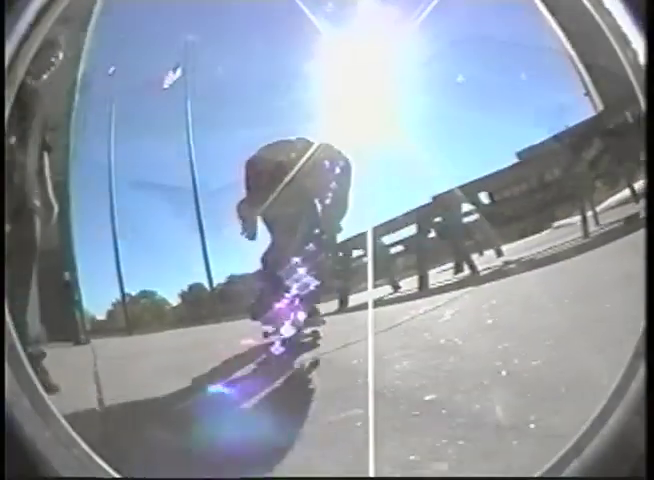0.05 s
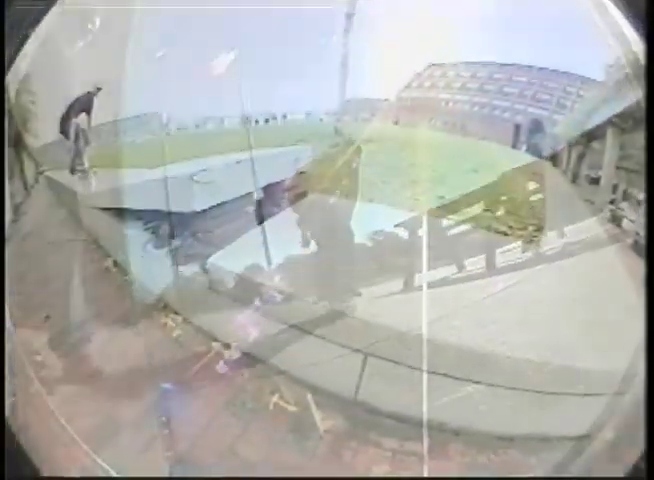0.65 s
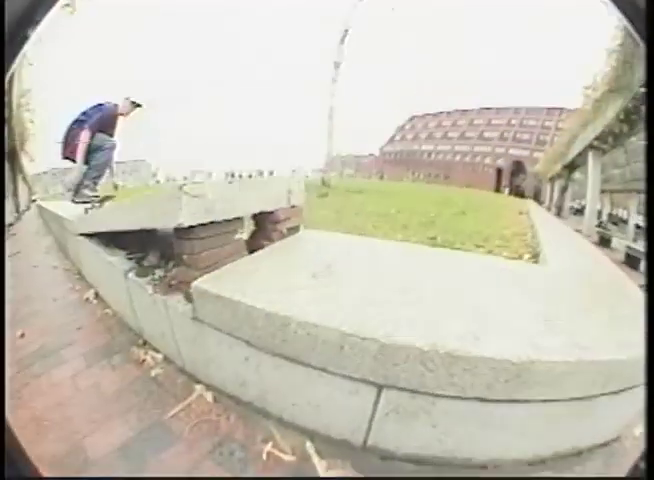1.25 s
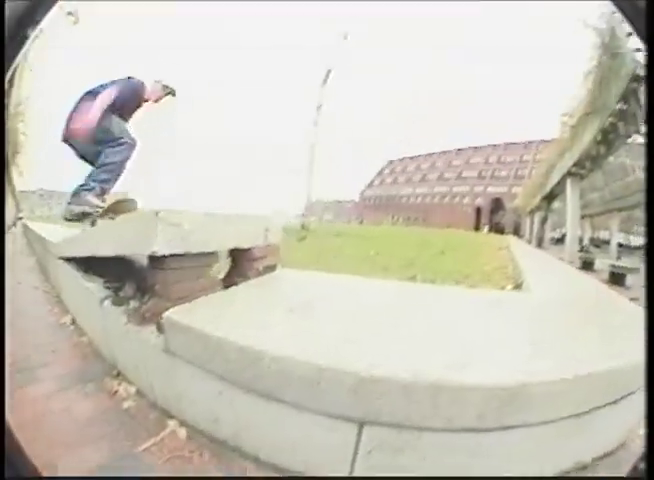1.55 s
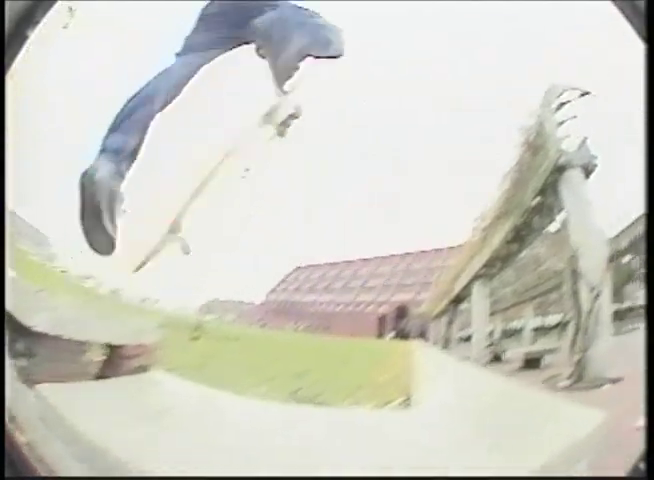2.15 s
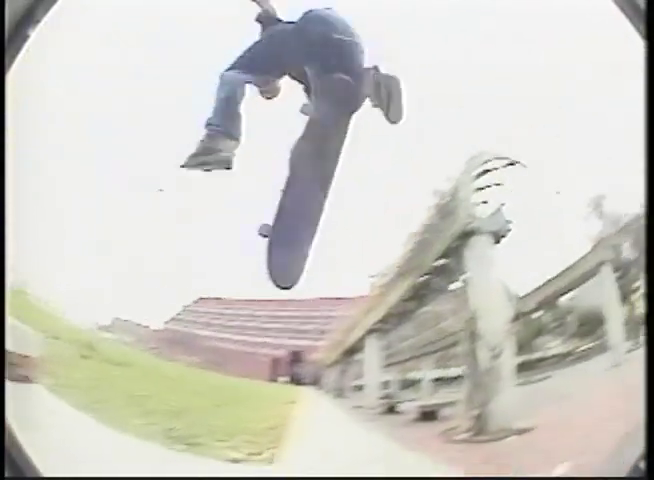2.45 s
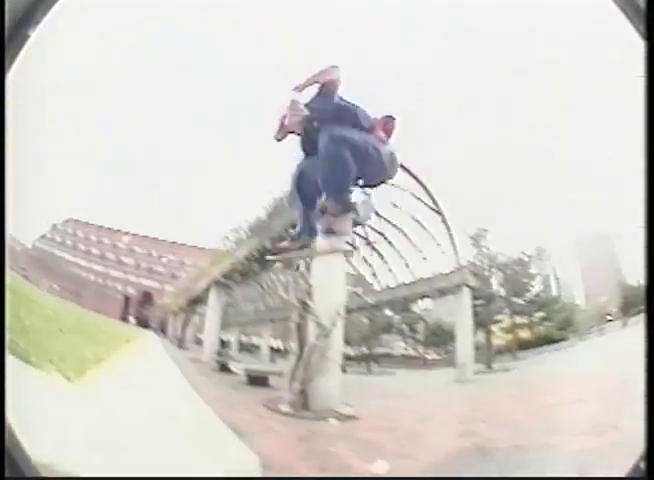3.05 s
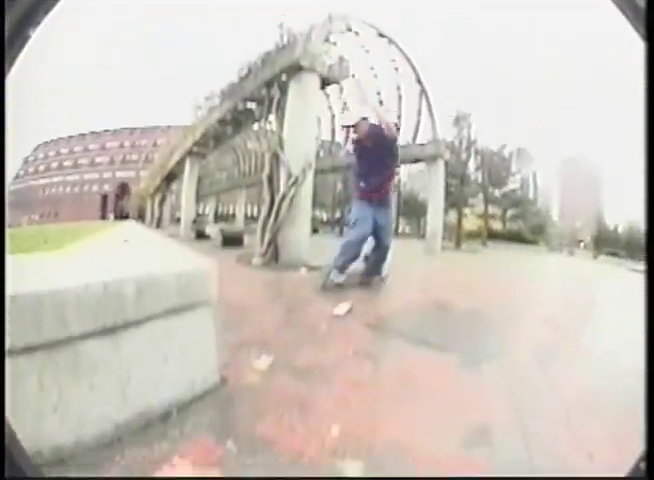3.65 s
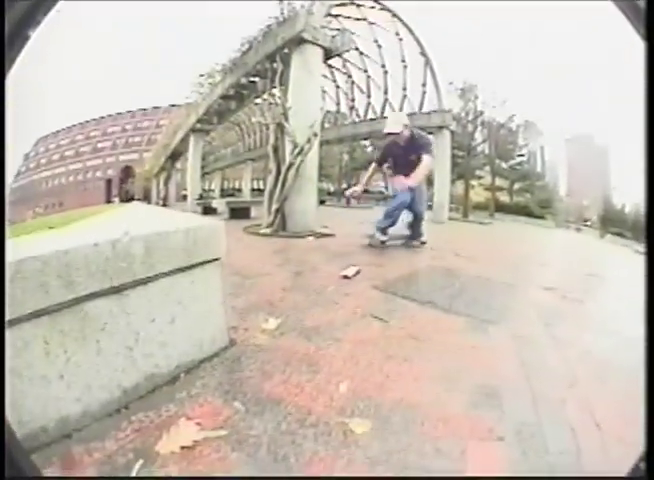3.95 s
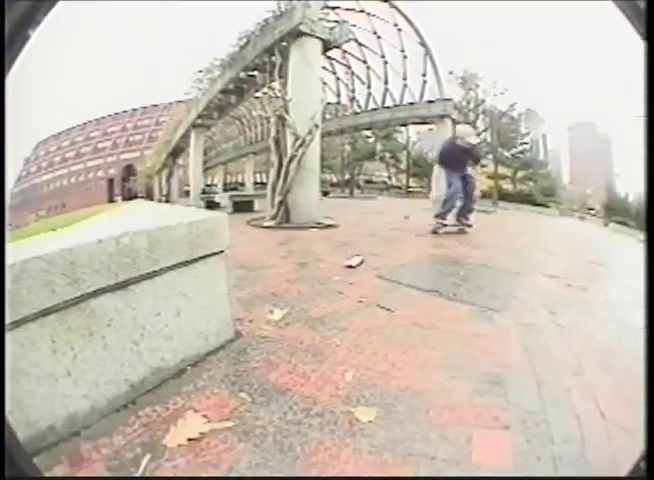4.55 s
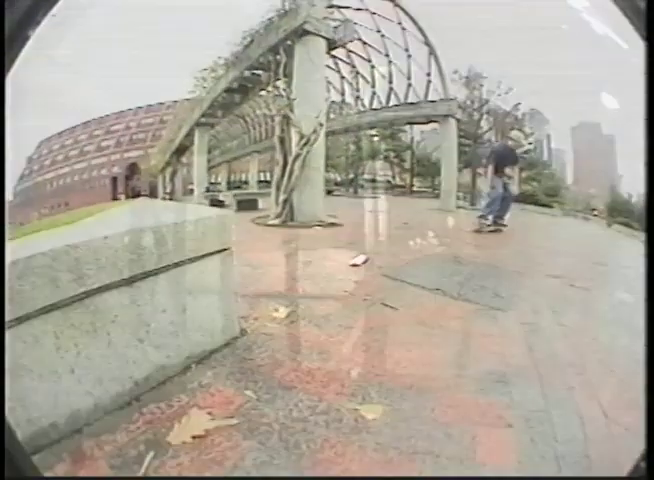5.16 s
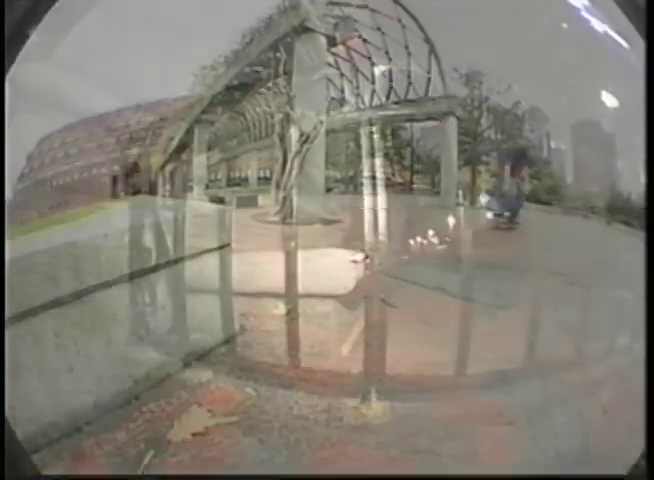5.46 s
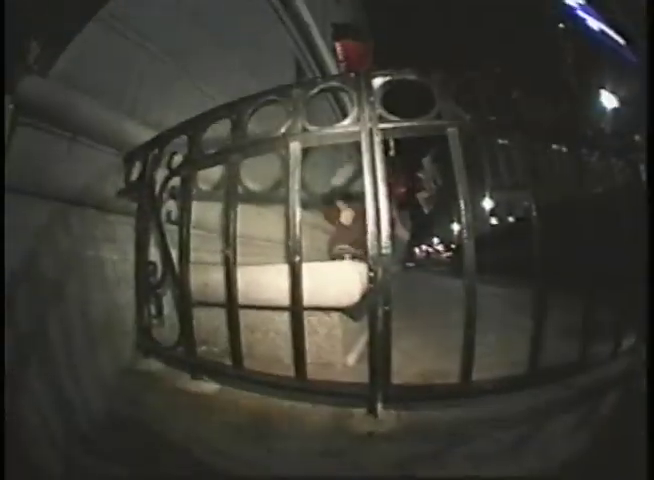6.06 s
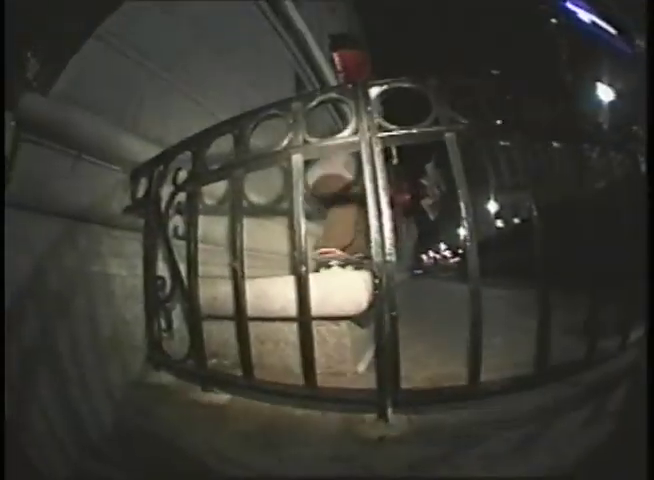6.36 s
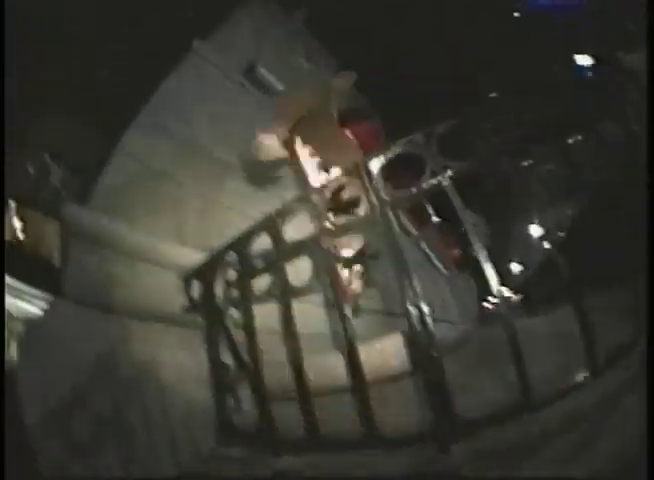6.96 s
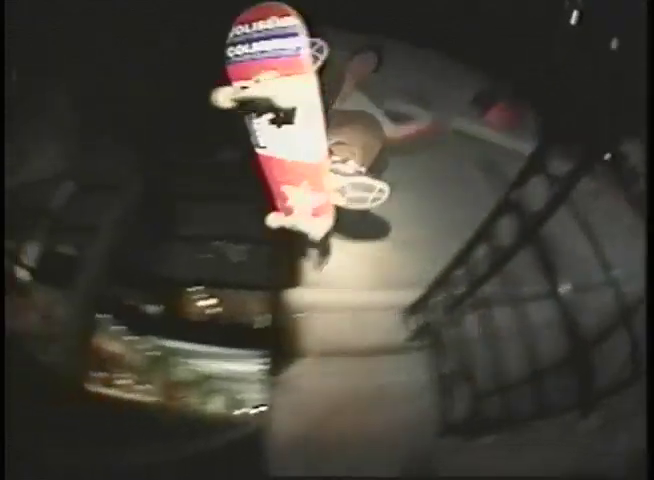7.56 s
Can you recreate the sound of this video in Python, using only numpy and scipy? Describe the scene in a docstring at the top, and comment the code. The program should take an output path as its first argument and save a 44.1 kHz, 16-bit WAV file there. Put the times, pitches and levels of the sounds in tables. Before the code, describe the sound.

In a paved town square, a skateboard rumbles and clacks over slabs, slams twice and pops into the air. Its wheels spin freely until a clattering landing, then it rolls off quietly with soft stamps on the deck. Another gritty run cuts in, followed by a crack of the tail, whirring bearings and a few knocks. The close microphone sounds slightly hollow and overloads on the hardest hits, which echo lightly.

```python
"""A paved town square, where a skateboard makes three runs close to a small microphone.
Hard wheels roar over the paving, snap chips of stone and knock across its seams. The rider pushes down,
the tail pops, the wheels spin free, the board knocks in the air and lands. Buildings and a far wall throw
the cracks back over the hum of the town. The microphone overloads on them and sounds hollow in the lows.
"""
import sys
import numpy as np
from scipy import signal
from scipy.fft import rfft, irfft, next_fast_len
from scipy.io import wavfile

SR = 44100
rng = np.random.default_rng(int(sys.argv[2]) if len(sys.argv) > 2 else 0)


def wrap_up_sound(samples):
    """Save the sound to the file named by the first command line argument, as 16-bit audio."""
    columns = np.atleast_2d(samples).T
    # keep every value between -1 and 1, then stretch to whole-number steps
    tamed = np.clip(columns, -1, 1)
    steps = np.round(tamed * 32767).astype(np.int16)
    wavfile.write(sys.argv[1], SR, steps)


N = 344131
TIME = np.arange(N) / SR


def from_db(db):
    """Turn decibels into a number to multiply by."""
    return 10 ** (np.asarray(db) / 20)


def rms_one(x):
    """Scale a sound so its average strength (rms) is 1."""
    return x / np.sqrt(np.mean(x ** 2) + 1e-20)


def peak_one(x):
    """Scale a sound so its biggest peak is 1."""
    return x / np.max(np.abs(x))


def butter(x, hz, kind, order=2):
    """Keep the lows, the highs or a band in between."""
    return signal.sosfilt(signal.butter(order, hz, kind, fs=SR, output="sos"), x)


def colour(x, spectrum):
    """Turn each frequency up or down, following rows of Hz and dB."""
    size = next_fast_len(len(x) + 2048)
    hz, db = np.transpose(spectrum)
    bins = np.maximum(np.arange(size // 2 + 1) * SR / size, 1)
    gain = from_db(np.interp(np.log(bins), np.log(hz), db))
    return irfft(rfft(x, size) * gain, size)[:len(x)]


def resonance(x, hz, width_hz):
    """Ring at one pitch; the narrower the width, the longer the ring."""
    r = np.exp(-np.pi * width_hz / SR)
    feedback = [1, -2 * r * np.cos(2 * np.pi * hz / SR), r * r]
    return signal.lfilter(np.array([1, 0, -1]) * (1 - r * r) / 2, feedback, x)


def ringing(x, modes):
    """Ring an object at all of its natural pitches."""
    return sum((-1) ** k * from_db(db) * resonance(x, hz, width)
               for k, (hz, width, db) in enumerate(modes))


def drift(per_s):
    """Wander between random values, per_s of them each second."""
    points = rng.standard_normal(4096)
    return rms_one(np.interp(TIME * per_s, np.arange(len(points)), points))


def grains(per_s, spread_db):
    """Tiny impacts at random moments, a few much harder than the rest."""
    sizes = from_db(spread_db * np.minimum(rng.exponential(1, N), 4)) * rng.choice([-1, 1], N)
    return sizes * (rng.random(N) < per_s / SR)


def gate(start_s, length_s, edge_s):
    """Fade in, hold at 1, fade out."""
    return np.clip(.5 + np.minimum(TIME - start_s, start_s + length_s - TIME) / edge_s, 0, 1)


def registers(x):
    """Split a sound into equally strong lows, mids and highs."""
    lows, below_highs = (signal.sosfiltfilt(signal.butter(3, hz, fs=SR, output="sos"), x, padtype=None)
                         for hz in (200, 1200))
    return rms_one(lows), rms_one(below_highs - lows), rms_one(x - below_highs)


# The notes of the steel. Each row: pitch in Hz, width in Hz, level in dB.
STEEL_NOTES = [(2050, 320, 2), (3240, 78, 8), (3910, 180, 3), (5150, 560, 2.5), (7160, 670, -5)]
def steel(x):
    """The axle and bearings ring when struck."""
    return ringing(x, STEEL_NOTES)


# The rider presses down before a pop, so the wheels grind harder.
# Each row: start in seconds, length in seconds, rumble boost in dB, grit boost in dB.
PUSHES = [(2.113, 0.087, 9.5, 15), (6.523, 0.5, 4, 8)]
def rolling(run, ground, rumble_db, roar_db, grit_db, rumble_follows, grit_follows,
            brighten_db_per_s, stones_per_s, spread_db, patchy_db):
    """Wheels strike the grains of the paving: a low rumble, a middle roar and high grit."""
    times, db = np.transpose(run)
    start, end = times[0], times[-1]
    swell_db = np.interp(TIME, times, db) - db.mean()
    bright_db = brighten_db_per_s * (np.clip(TIME, start, end) - (start + end) / 2)
    push_rumble, push_grit = sum(np.outer(boosts, gate(at, length, edge_s=0.061))
                                 for at, length, *boosts in PUSHES)
    lows, mids, highs = registers(colour(grains(stones_per_s, spread_db), ground))
    rough_db = patchy_db * drift(110)   # rough patches raise the grit
    sand = rms_one(butter(steel(grains(70, 2.8) + 1e-18), 4500, "low"))   # loose sand pings the steel
    sandy_highs = highs + from_db(-10.5) * sand
    rumble = from_db(rumble_db + rumble_follows * swell_db - bright_db + push_rumble) * lows
    roar = from_db(roar_db + swell_db + rough_db / 2) * mids
    grit = from_db(grit_db + grit_follows * swell_db + bright_db + push_grit + rough_db) * sandy_highs
    return from_db(db.mean()) * gate(start, end - start, edge_s=0.022) * (rumble + roar + grit)


# Speed and distance set the loudness on each ground. Each row: time in seconds, level in dB.
ON_PLAZA = [(0.0, -27.5), (0.176, -23.5), (0.76, -31)]
ON_LEDGE = [(0.75, -30), (1.052, -29), (1.358, -32), (1.478, -33.5), (1.59, -34.5), (1.912, -28.5),
            (2.032, -29), (2.18, -30.5)]
ON_BRICK = [(3.66, -38), (3.79, -38), (3.86, -43), (4.04, -53), (4.16, -44.5), (4.27, -52.5), (4.5, -59.5),
            (4.7, -58.5), (4.99, -68)]
ON_STONE = [(5.005, -26.5), (5.043, -35), (5.177, -33), (5.755, -32), (6.147, -34), (6.335, -31.5),
            (6.519, -26.5), (6.629, -32), (6.79, -35)]
# The tone of the wheels on each ground. Each row: frequency in Hz, level in dB.
PLAZA_TONE = [(25, -4), (60, -14.5), (180, -4), (400, 10.5), (850, 5.5), (1080, -5.5), (1230, -13),
              (1550, -15.5), (2700, -20.5), (3300, -22.5), (3800, -28), (5000, -30.5), (9000, -28)]
LEDGE_TONE = [(25, -23), (60, -11), (110, -6.5), (180, -4), (280, 0), (370, 3.5), (470, -1), (800, -6),
              (1400, -21.5), (1800, -20.5), (3200, -26), (5000, -30)]
BRICK_TONE = [(25, -24), (110, 13.5), (200, -17), (350, -13), (480, -20), (720, -18.5), (1100, -25),
              (2000, -10.5), (5000, -18)]
STONE_TONE = [(25, -5), (90, -1.5), (190, -3.5), (235, 1.5), (278, 5), (330, -0.5), (400, 2), (550, 0),
              (850, -7.5), (1300, -16.5), (2400, -18.5), (4000, -19), (5000, -27.5)]
def rolling_wheels():
    """The board rolls over four grounds, each with its own grain."""
    plaza = rolling(ON_PLAZA, PLAZA_TONE, rumble_db=-8, roar_db=-3, grit_db=-7.5,
                    rumble_follows=1, grit_follows=0.55, brighten_db_per_s=13,
                    stones_per_s=6000, spread_db=4.5, patchy_db=1.5)
    ledge = rolling(ON_LEDGE, LEDGE_TONE, rumble_db=-7, roar_db=-1.5, grit_db=-9,
                    rumble_follows=0.11, grit_follows=1.86, brighten_db_per_s=0,
                    stones_per_s=7000, spread_db=3, patchy_db=1.5)
    brick = rolling(ON_BRICK, BRICK_TONE, rumble_db=-3, roar_db=3, grit_db=-6,
                    rumble_follows=0.73, grit_follows=0.58, brighten_db_per_s=-2.5,
                    stones_per_s=5000, spread_db=3.5, patchy_db=0)
    stone = rolling(ON_STONE, STONE_TONE, rumble_db=-5.5, roar_db=1, grit_db=-5.5,
                    rumble_follows=0.98, grit_follows=0.53, brighten_db_per_s=-1,
                    stones_per_s=7000, spread_db=1, patchy_db=2)
    return plaza + ledge + brick + stone


# The notes of the trucks, which hold the wheels. Each row: pitch in Hz, width in Hz, level in dB.
TRUCK_NOTES = [(1260, 32, -22), (1950, 60, -21), (2420, 12, -3.5), (3330, 19, -25), (3880, 27, -25),
               (4340, 100, -8.5), (5670, 1300, -4)]
def trucks(x):
    """The shaking board also rings the metal under it."""
    return 0.83 * (x + sum(from_db(db) * resonance(x, hz, width) for hz, width, db in TRUCK_NOTES))


# The tone of the town. Each row: frequency in Hz, level in dB.
TOWN_TONE = [(25, -0.5), (60, -5), (110, -4), (250, -14), (700, -18), (1100, -23.5), (1650, -28),
             (2050, -23), (2500, -28.5), (3400, -30.5), (8000, -43), (16000, -39)]
def town():
    """The far town is a faint, steady, low noise."""
    return from_db(-53.5) * rms_one(colour(rng.standard_normal(N), TOWN_TONE))


# The notes of the deck (the wooden board) with its trucks, and of its plywood after a hard blow.
# Each row: pitch in Hz, width in Hz, level in dB.
DECK_NOTES = [(217.5, 88, -2.5), (284, 51, 1.5), (372, 43.4, 2), (567.5, 123, 5.5), (693, 280, 4),
              (874, 273, 5.5), (1033, 436, -3), (1710, 1040, -11.5)]
PLYWOOD_NOTES = [(620, 28, 0.5), (768, 136, -1.5), (874, 36, 3.5), (1130, 82, 0), (1370, 146, -4.5),
                 (1554, 115, -7), (1740, 83, 0), (1925, 38, -3), (2226, 65, -4), (2410, 64, -9.5),
                 (2820, 630, -10)]
# The tone of a crack. Each row: frequency in Hz, level in dB.
CRACK_TONE = [(500, -23), (1000, 4.5), (1800, -1), (3000, 1), (5000, -6.5)]
def blows(hits, knock_db, thump_db, crack_db, plywood_db, decay_s,
          first_contact=10.7, crack_share=1.0, tilt_db=1.0, rise_s=0.00027):
    """A hit, then a dying rattle: the deck knocks and bounces, the plywood rings, the contact cracks."""
    out, t = np.zeros(N + SR), TIME[:SR // 4]
    dying = np.exp(-t / decay_s)
    rising = 1 - np.exp(-t / rise_s)
    thump_hz = 134.4   # the loaded board bounces on the rubber in its trucks
    for (start, knock, crack), (rattle, hiss) in zip(hits, rng.standard_normal((len(hits), 2, len(t)))):
        force = rattle * dying + first_contact * (t == 0)
        # the more a hit cracks, the more it favours the higher notes
        db_per_octave = tilt_db + 0.89 * max(crack - knock + 15, -4)
        notes = [(hz, width, db + db_per_octave * np.log2(hz)) for hz, width, db in DECK_NOTES]
        deck = peak_one(ringing(force, notes))
        bounce = peak_one(resonance(butter(force, 2 * thump_hz, "low"), thump_hz, width_hz=71))
        plywood = peak_one(ringing(force * dying, PLYWOOD_NOTES))
        snap = rms_one(colour(hiss, CRACK_TONE)) * rising * dying ** (1 / crack_share)
        at = round(start * SR)
        out[at:at + len(t)] += (from_db(knock + knock_db) * deck + from_db(knock + thump_db) * bounce
                                + from_db(crack + plywood_db) * plywood
                                + from_db(crack + crack_db) * snap)
    return out[:N]


# Each row: start in seconds, knock level in dB, crack level in dB.
SEAM_HITS = [(0.139, -14.5, -26.5), (0.192, -16.5, -30), (0.296, -13.5, -34), (0.408, -51, -31.5),
             (0.474, -30, -30.5), (0.511, -26, -49), (0.537, -30, -30.5), (0.59, -12, -27.5),
             (0.651, -13, -28.5), (0.688, -15, -34), (0.72, -9, -22), (0.786, -28, -36),
             (0.839, -14.5, -27), (0.900, -12, -24.5), (0.976, -19.5, -32), (1.026, -20, -30),
             (1.061, -15.5, -32), (1.783, -14, -29.5), (1.828, -15.5, -56), (1.945, -12, -27),
             (1.966, -14.5, -27.5), (2.089, -17, -26), (3.739, -28, -39.5), (4.307, -37, -50.5),
             (5.033, -16, -24), (5.046, -10.5, -27), (5.068, -15.5, -32.5), (5.282, -14.5, -31),
             (5.303, -16, -44), (5.457, -23, -29), (5.691, -14.5, -23), (5.704, -10.5, -27),
             (5.952, -10, -27.5), (6.506, -19, -30.5), (6.565, -15, -30), (6.729, -12, -32),
             (6.752, -8, -24.5)]
def seams():
    """The wheels knock across the gaps in the paving."""
    return blows(SEAM_HITS, knock_db=-3.5, thump_db=-17.5, crack_db=2.5, plywood_db=-3.5,
                 decay_s=0.022, first_contact=13, crack_share=0.6, tilt_db=-2.5)


def steel_ticks(ticks, level_db, crunch_s, snap_db):
    """A brief crunch snaps and leaves the steel ringing for a moment."""
    out, t = np.zeros(N + SR), TIME[:SR // 16]
    for (start, db), noise in zip(ticks, rng.standard_normal((len(ticks), len(t)))):
        crunch = noise * np.exp(-t / crunch_s)
        snap = from_db(snap_db) * peak_one(butter(crunch, 1500, "high"))
        at = round(start * SR)
        out[at:at + len(t)] += from_db(db + level_db) * (peak_one(steel(crunch)) + snap)
    return out[:N]


# Each row: start in seconds, level in dB.
CHIP_SNAPS = [(0.1396, -25), (0.193, -26), (0.408, -27), (0.4239, -18.5), (0.503, -31), (0.591, -29),
              (0.603, -26), (0.6285, -16), (0.6515, -15), (0.735, -26), (0.9005, -27), (0.9772, -19),
              (1.0278, -19), (1.048, -21), (1.0605, -17.5), (2.0128, -22), (2.039, -17), (2.0867, -27),
              (5.004, -20), (5.282, -22), (5.304, -27), (5.5712, -22), (5.8042, -17), (5.8525, -17.5),
              (5.9502, -13), (6.061, -20), (6.1433, -18), (6.2023, -18.5), (6.3135, -16), (6.3555, -23),
              (6.4915, -22), (6.6855, -10), (7.746, -18.5)]
def stone_chips():
    """Chips of stone snap under a wheel and ring its steel."""
    return steel_ticks(CHIP_SNAPS, level_db=-6.5, crunch_s=0.002, snap_db=0.5)


def reflect(x, tail, db):
    """Give every moment of a sound the same echo tail."""
    return from_db(db) * signal.fftconvolve(x, tail / np.linalg.norm(tail))[:N]


# The tone of the echo. Each row: frequency in Hz, level in dB.
ECHO_TONE = [(100, -32), (370, -6), (800, -15), (1600, -1.5), (3000, -2), (5000, 0), (12000, -5.5)]
def buildings(x, fade_s=0.54, build_s=0.18):
    """House fronts scatter the sound back: an echo that builds up, then dies away."""
    t = TIME[:3 * SR // 2]
    shape = from_db(-60 * t / fade_s) * (1 - np.exp(-(t / build_s) ** 2))
    return reflect(x, colour(rng.standard_normal(len(t)), ECHO_TONE) * shape, db=-27)


# Each row: start in seconds, length in seconds, pitch in Hz, level in dB.
SHIVER_NOTES = [(0.49, 0.6, 1163, -38), (0.84, 0.4, 372, -34), (1.832, 0.48, 793, -38),
                (2.868, 0.067, 650, -53), (5.488, 0.48, 275, -35), (6.485, 0.16, 3240, -43),
                (6.505, 0.16, 770, -36.5), (6.483, 0.15, 5150, -43), (6.732, 0.037, 590, -26),
                (6.977, 0.078, 1610, -45), (7.56, 0.091, 928, -40.5)]
def shivering_notes(level_db=-1.5, width_hz=79):
    """Single notes of the wheels or trucks shiver, on the ground and in the air."""
    taps = grains(900, 3.8)
    out = 0
    for start, length, hz, db in SHIVER_NOTES:
        note = rms_one(resonance(resonance(taps, hz, width_hz), hz, width_hz))
        out += from_db(db + level_db) * gate(start, length, edge_s=0.018) * note
    return out


# Each row: start in seconds, length in seconds, pitch in Hz, level in dB.
HUMS = [(0.958, 0.14, 374.7, -30.5), (1.206, 0.023, 372, -19.5), (1.351, 0.011, 372, -10),
        (1.355, 0.029, 114.3, -24), (1.466, 0.055, 375, -30.5), (1.533, 0.035, 112.9, -23),
        (1.59, 0.079, 113, -39), (4.095, 0.014, 359.3, -21), (4.096, 0.019, 548, -28),
        (4.14, 0.057, 740, -46), (5.28, 0.083, 280, -65)]
def board_hums(level_db=2.5, waver_hz=14.9):
    """Short, wavering low hums: the board booms after slams and thuds, and hums while rolling."""
    waver = waver_hz * drift(90)
    out = 0
    for start, length, hz, db in HUMS:
        note = np.sin(2 * np.pi * np.cumsum(hz + waver) / SR)
        out += from_db(db + level_db) * gate(start, length, edge_s=0.011) * note
    return out


# Each row: start in seconds, knock level in dB, crack level in dB.
SLAM_HITS = [(1.350, -11, -28.5), (1.529, -11, -28), (7.702, -25, -48), (7.712, -21, -32.5),
             (7.719, -35, -49)]
def slams():
    """The wheels slam onto slabs."""
    return blows(SLAM_HITS, knock_db=3, thump_db=-3.5, crack_db=8.5, plywood_db=17,
                 decay_s=0.011, rise_s=0.00019)


# Where a blow lands decides which notes ring on.
# Each row: start in seconds, pitch in Hz, level in dB, seconds to fade by 60 dB.
BENDING_NOTES = [(1.350, 1130, -12.5, 0.058), (1.350, 1570, -33, 0.034), (1.350, 1914, -12, 0.035),
                 (1.529, 720, -25, 0.074), (2.968, 712, -34, 0.26), (2.968, 470, -37, 0.15),
                 (3.634, 283, -21, 0.15), (4.307, 720, -38, 0.15), (5.282, 584, -47, 0.056),
                 (6.768, 281, -17, 0.09), (7.471, 743, -31, 0.06), (7.515, 446, -23, 0.07),
                 (7.514, 557, -26, 0.13), (7.514, 693, -32, 0.1)]
def deck_rings(level_db=-2, waver_hz=21.7, shiver=0.55):
    """The struck deck bends to and fro; its pitch wavers and its level shivers as the trucks rattle."""
    waver = waver_hz * drift(120)
    out = 0
    for start, hz, db, fade_s in BENDING_NOTES:
        age = np.maximum(TIME - start, 0)
        note = np.sin(2 * np.pi * np.cumsum((hz + waver) * (age > 0)) / SR)
        out += from_db(db + level_db - 60 * age / fade_s) * note
    return out * (1 + shiver * drift(250))


def far_wall(x, delay_s=0.17, spread_s=0.091):
    """One distant wall answers later, dull and smeared."""
    t = TIME[:SR // 2]
    smear = rng.standard_normal(len(t)) * np.exp(-((t - delay_s) / spread_s) ** 2)
    return reflect(x, butter(smear, [500, 2210], "band"), db=-33.5)


# Each row: start in seconds, knock level in dB, crack level in dB.
POP_HITS = [(2.153, -13.5, -25.5), (6.768, -14, -25.5)]
def tail_pops(gap_s=0.01, louder_db=0.5):
    """The tail of the board strikes the ground, then scuffs it again a touch louder."""
    contacts = [(start + k * gap_s, knock + k * louder_db, crack + k * louder_db)
                for start, knock, crack in POP_HITS for k in range(2)]
    return blows(contacts, knock_db=7, thump_db=-13, crack_db=8, plywood_db=23,
                 decay_s=0.013, tilt_db=1.5, rise_s=0.00033)


# A kick sets the wheels spinning. Each row: start in seconds, length in seconds,
# whirr, hiss and ring levels in dB, the whirr's fade in dB per second (below zero it grows).
SPINS = [(2.198, 1, -37.5, -28, -47, 45.5), (2.924, 0.35, -55, -54, -59, 30),
         (3.177, 0.26, -54.5, -50, -56.5, 25), (6.752, 0.54, -35.5, -35, -42, 14.5),
         (7.286, 0.24, -47, -43.5, -51, -7.5), (7.558, 0.35, -37.5, -32, -52, 7)]
# The tone of the bearings. Each row: frequency in Hz, level in dB.
BEARING_TONE = [(100, -2.5), (300, -6.5), (500, -2.5), (730, -5.5), (1300, -8.5), (2100, -4.5),
                (3200, -6.5), (4100, -5.5), (5000, -16)]
# A free wheel sings on its axle. Each row: pitch in Hz, width in Hz, level in dB.
WHEEL_NOTES = [(654, 27, -0.5), (1280, 43, 2.5), (1660, 74, -4), (1943, 88, 1), (2500, 590, -23)]
def free_wheels(whirr_db=-0.5, hiss_db=-6, ring_db=-5, turns_hz=25, wobble_db=1.2):
    """Balls tick round in the bearings and ring the wheel, louder once in every turn."""
    balls = grains(5000, 3.56)
    _, mids, highs = registers(colour(balls, BEARING_TONE))
    singing = rms_one(ringing(balls, WHEEL_NOTES))
    turn = np.sin(2 * np.pi * np.cumsum(turns_hz * (1 + 0.168 * drift(8.6))) / SR)
    out = 0
    for start, length, whirr, hiss, ring, fade in SPINS:
        lost_db = fade * np.clip(TIME - start, 0, length)
        spin = (from_db(whirr + whirr_db - lost_db) * mids
                + from_db(hiss + hiss_db - 1.98 * lost_db) * highs   # the hiss fades first
                + from_db(ring + ring_db - 0.53 * lost_db) * singing)   # the ring fades last
        out += gate(start, length, edge_s=0.032) * spin
    return from_db(wobble_db * turn) * out


# Each row: start in seconds, level in dB.
WASHER_TICKS = [(2.356, -34), (2.632, -41.5), (2.820, -41.5), (3.098, -47)]
def washers():
    """Loose washers tick while the board is in the air."""
    return steel_ticks(WASHER_TICKS, level_db=-1, crunch_s=0.0017, snap_db=-10)


# Each row: start in seconds, knock level in dB, crack level in dB.
AIR_HITS = [(2.971, -27, -43), (2.989, -32, -48), (3.026, -33.5, -51), (3.182, -44, -57),
            (6.932, -30, -38.5), (7.471, -38, -62), (7.514, -17.5, -33.5)]
def air_knocks():
    """Light knocks on the board in the air, and one harder woody strike."""
    return blows(AIR_HITS, knock_db=3.5, thump_db=-14, crack_db=5, plywood_db=11,
                 decay_s=0.024, first_contact=12, tilt_db=0, rise_s=0.00057)


# Each row: start in seconds, knock level in dB, crack level in dB.
LANDING_HITS = [(3.622, -12.5, -28.5), (3.634, -11, -27.5), (3.648, -14, -29), (3.664, -13, -31),
                (3.679, -16, -40)]
def landing():
    """The wheels touch down one after another, then deck and trucks clatter."""
    return blows(LANDING_HITS, knock_db=0.5, thump_db=-8.5, crack_db=5, plywood_db=13.5, decay_s=0.015)


# Each row: start in seconds, knock level in dB, crack level in dB.
THUD_HITS = [(3.982, -30.5, -49.5), (4.092, -19, -35.5), (4.372, -29, -49), (4.402, -35.5, -47),
             (4.868, -29.5, -51.5)]
def thuds():
    """Shoes stamp on the deck and the board settles, dull and soft."""
    return blows(THUD_HITS, knock_db=-3, thump_db=-8, crack_db=6, plywood_db=5,
                 decay_s=0.017, first_contact=1.9, tilt_db=-1, rise_s=0.0053)


# Each row: frequency in Hz, change in level in dB.
TREBLE_SHAPE = [(4800, -0.5), (5600, -7.5), (6250, -12), (7500, -13.5), (8500, -32.5), (12000, -31.5),
                (14200, -14.5), (15600, -16)]
def dull_highs(x):
    """The highs are dulled, with a faint band of hiss near 14-16 kHz."""
    return colour(x, TREBLE_SHAPE)


def stereo_mic(x, right_db=0.8):
    """Left and right sit close together and hear nearly the same; only nearby echoes differ a little."""
    t = TIME[:SR // 8]
    near = butter(rng.standard_normal(len(t)) * np.exp(-t / .03), [200, 1600], "band", order=1)
    side = reflect(x, near, db=-28)
    return np.array([(x + side) * from_db(-right_db / 2), (x - side) * from_db(right_db / 2)])


def scene():
    """Mix the board, its echoes and the far town."""
    wheels = rolling_wheels() + free_wheels()
    ticks = stone_chips() + washers()
    knocks = seams() + air_knocks() + thuds()
    hard_hits = slams() + tail_pops() + landing()
    board = trucks(wheels + knocks + hard_hits) + ticks + board_hums() + shivering_notes() + deck_rings()
    echo = buildings(hard_hits + knocks / 2) + far_wall(hard_hits)
    return stereo_mic(dull_highs(board + echo) + town())


def hollow(x, copy_db=-3, lead_s=0.0123):
    """Taking away a dull, slightly early copy cuts a row of dips into the lows."""
    lead = round(lead_s * SR)
    dull = butter(x, [120, 900], "band")
    return x - from_db(copy_db) * np.pad(dull[:, lead:], [(0, 0), (0, lead)])


def record(dry, ceiling=0.13, cutoff_hz=15750):
    """Both channels overload together, the lows turn hollow, the very top and bottom are cut."""
    clipped = dry / (1 + (dry.mean(axis=0) / ceiling) ** 6) ** (1 / 6)
    top_cut = signal.ellip(10, .2, 80, cutoff_hz, fs=SR, output="sos")
    return signal.sosfilt(top_cut, butter(hollow(clipped), 22, "high"))


dry = scene()
out = record(dry)
wrap_up_sound(out)
```